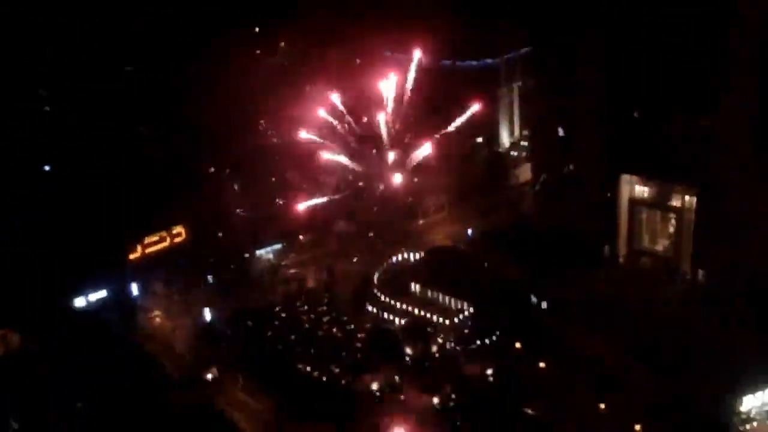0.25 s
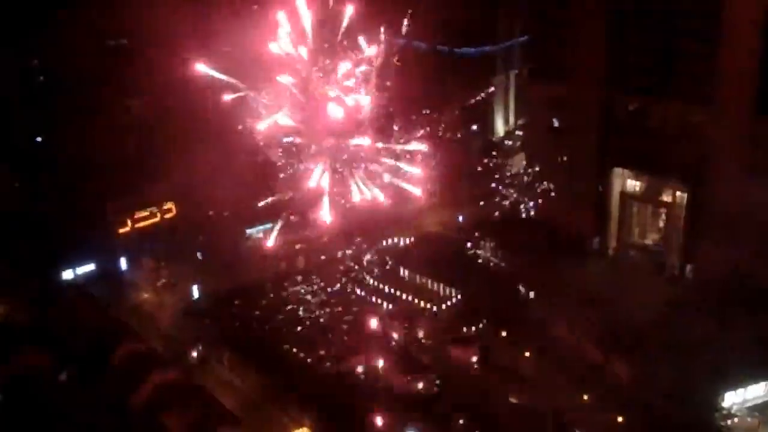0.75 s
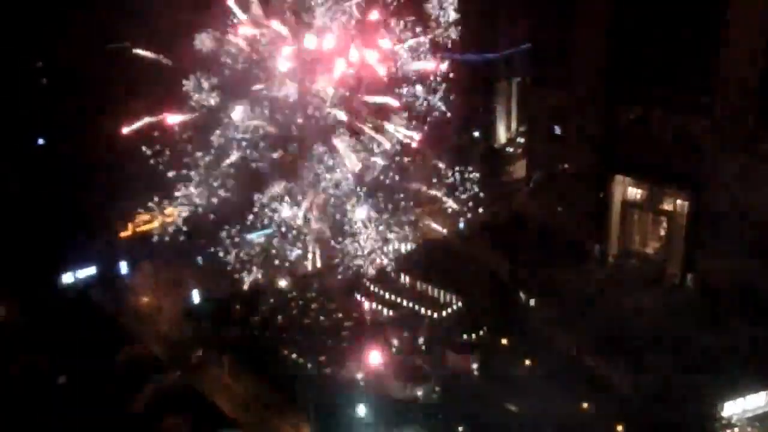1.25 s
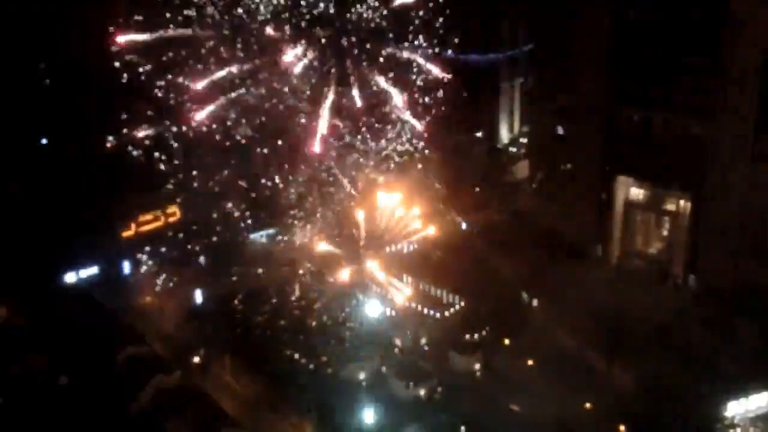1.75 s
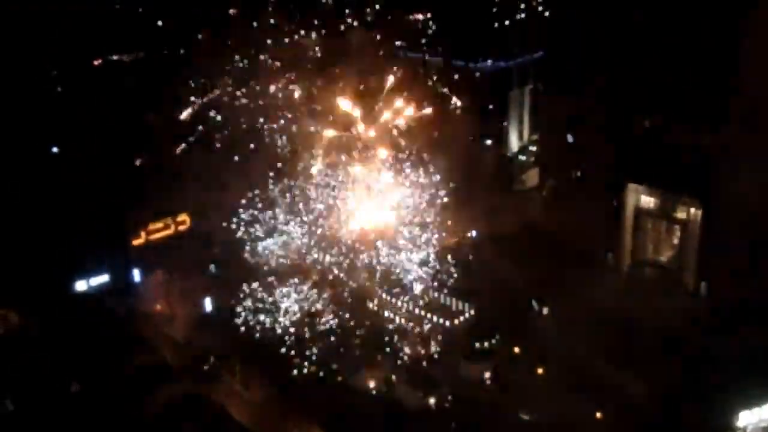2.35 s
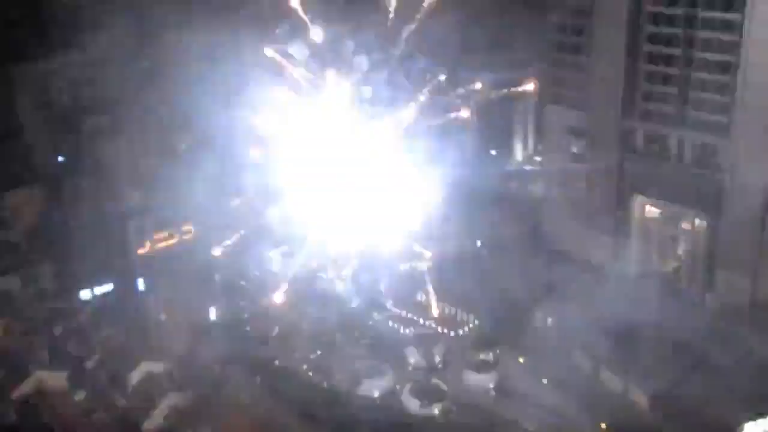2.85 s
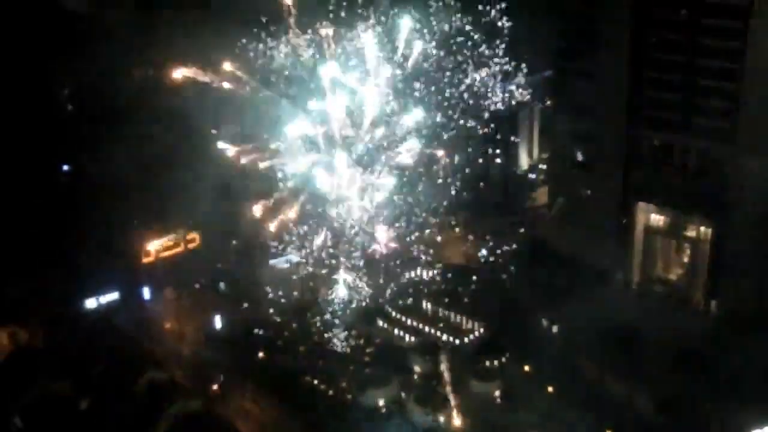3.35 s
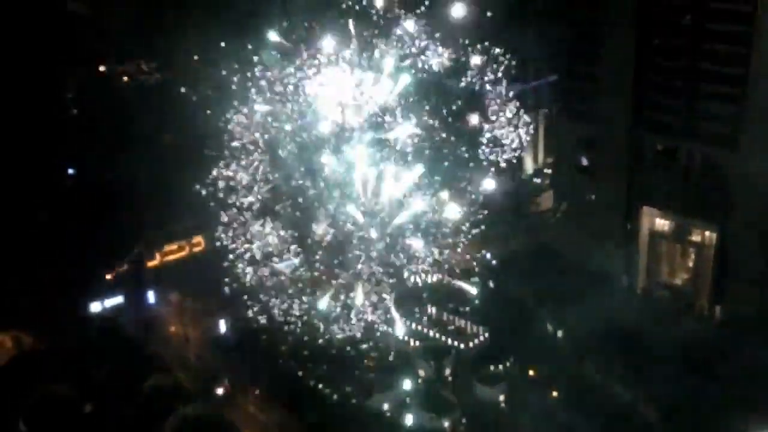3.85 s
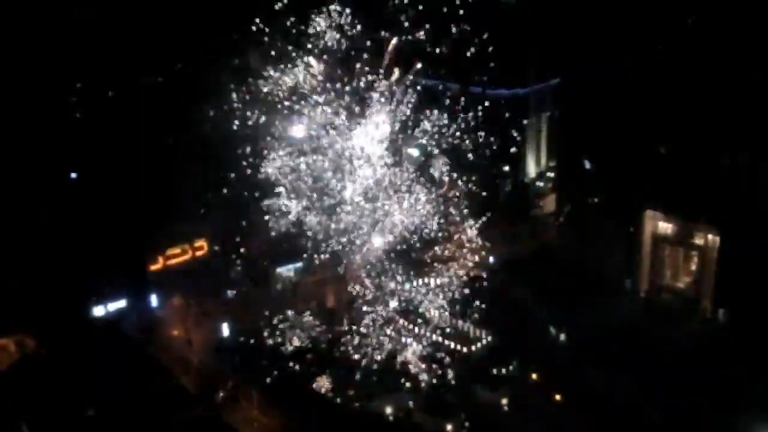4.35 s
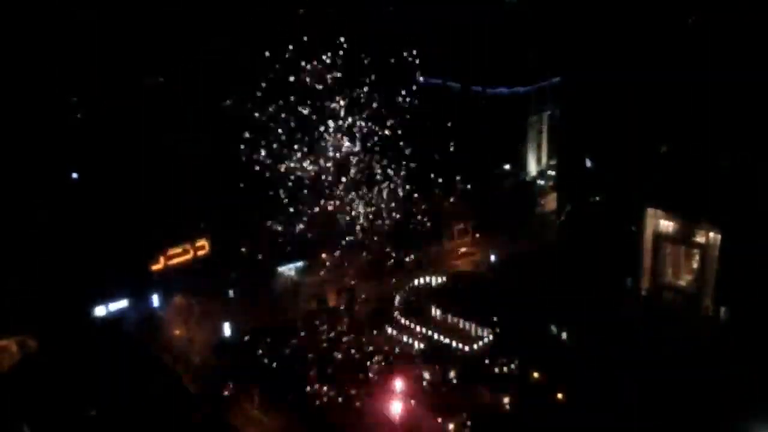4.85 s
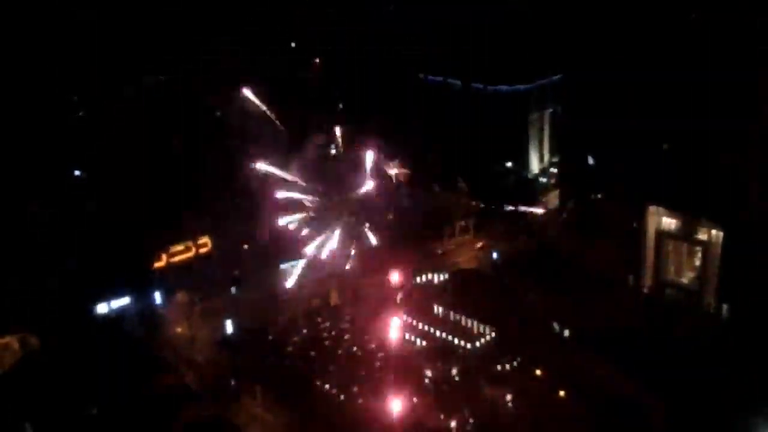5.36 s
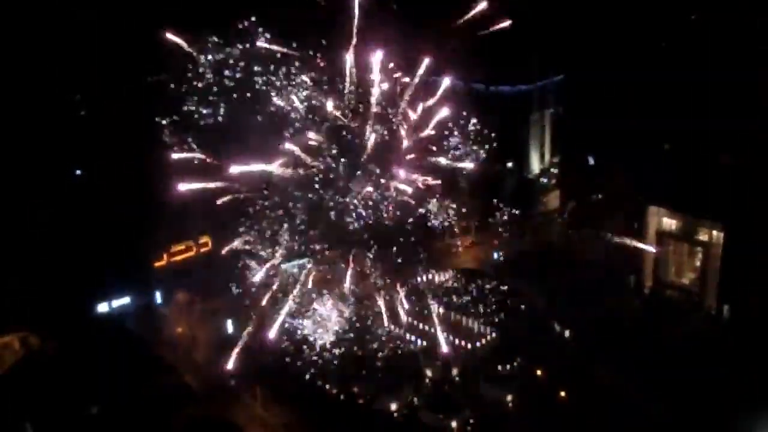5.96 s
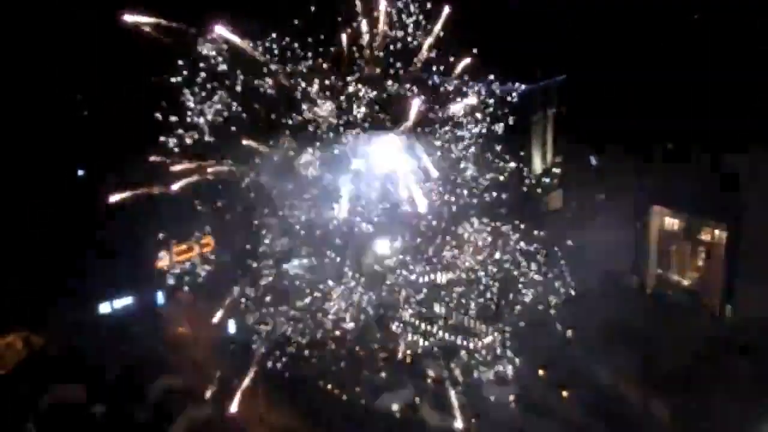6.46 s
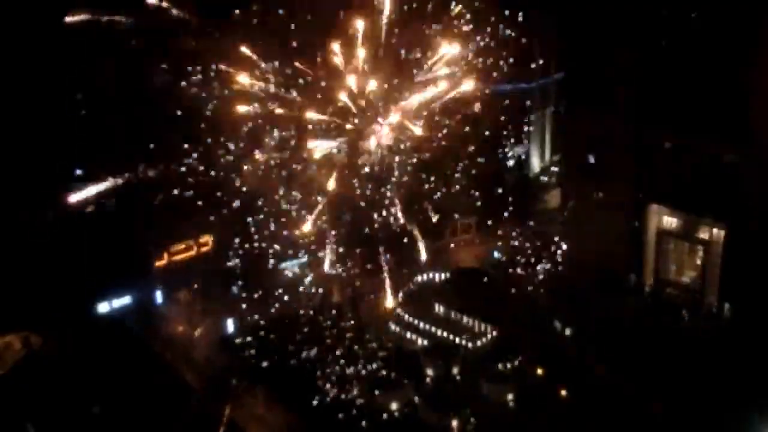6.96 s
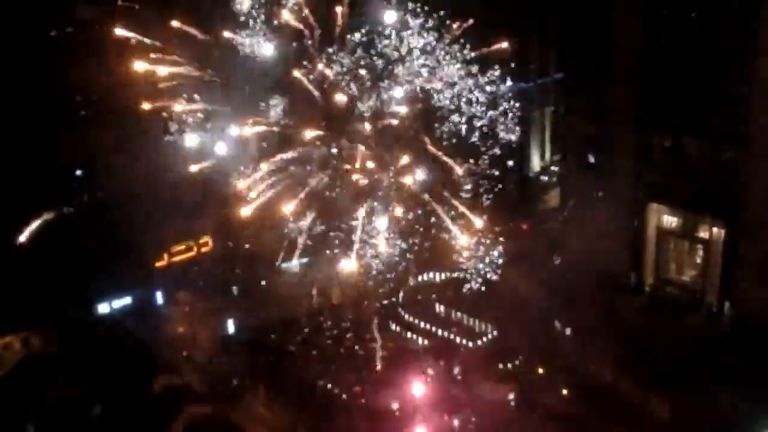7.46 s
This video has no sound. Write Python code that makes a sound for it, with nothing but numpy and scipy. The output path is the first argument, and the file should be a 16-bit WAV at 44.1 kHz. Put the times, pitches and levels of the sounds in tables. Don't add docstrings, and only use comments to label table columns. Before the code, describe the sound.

A dense night firework display in a city, heard from indoors by a closed high window. Deep thumps strike the pane, which snaps and faintly rattles, while small crackers pop irregularly between them. A continuous bed of dry crackling, faint sizzle and distant rumbling barrage never stops. Around one second a quick string of small crackers ticks brightly; later heavy bursts come in close groups.

```python
import sys
import numpy as np
from scipy import signal
from scipy.fft import rfft, irfft, next_fast_len
from scipy.io import wavfile

SR = 44100
rng = np.random.default_rng(int(sys.argv[2]) if len(sys.argv) > 2 else 0)


def makeup_ratio(level_db):
    decades = np.asarray(level_db, float) / 20
    return 10 ** decades


def waveform_to_disk(signal):
    frames = np.transpose(np.atleast_2d(signal))
    scaled = np.clip(frames, -1, 1) * 32767
    samples = np.round(scaled).astype(np.int16)
    wavfile.write(sys.argv[1], SR, samples)


N = 339570

# frequency in Hz, density in dB per Hz.
HISS_SPECTRUM = [(3000, -18.5), (6000, -10), (10000, 2), (13000, 1.5), (15500, -2)]
# frequency in Hz, left over right in dB.
PORT_BALANCE = [(200, 1.7), (600, 1.1), (2000, 1.8), (6000, 3.2), (13000, 1.7)]
# frequency in Hz, likeness 0-1.
PORT_LIKENESS = [(300, 0.99), (1000, 0.99), (2000, .92), (4500, 0.74), (12000, 0.98)]
# frequency in Hz, likeness 0-1.
FRAME_LIKENESS = [(3000, 0.54), (12000, 0.65)]

# time in seconds, level in dB.
FAR_BARRAGE = [(0, -31.5), (.4, -34), (1.1, -29), (2.2, -36.5), (3.2, -30.5), (4, -32.5), (4.8, -35),
               (5.5, -31.5), (6.1, -31), (6.7, -35.5), (7.3, -27), (7.7, -31)]
# time in seconds, crackle in dB, sizzle of the nearest in dB.
BURNING_STARS = [(0.0, -42, -72), (0.66, -44, -73), (0.79, -42.5, -73.5), (2.1, -43.5, -69),
                 (2.27, -43.5, -71.5), (2.59, -44.5, -66), (3.0, -46.5, -79), (3.15, -43, -70),
                 (3.64, -44, -72.5), (4.03, -40, -65), (4.33, -43, -70), (4.76, -42.5, -70),
                 (5.25, -43.5, -75), (5.51, -46.5, -80), (5.96, -45, -74), (6.63, -46.5, -69),
                 (7.25, -42, -72), (7.7, -41.5, -67)]
# centre in seconds, half width in seconds, crackle in dB, sizzle in dB.
STAR_FLARES = [
    (1.22, 0.062, -54, -70),
    (1.98, 0.052, -42, -74),
    (4.63, .06, -43, -61),
    (6.7, 0.038, -46, -70),
]

# frequency in Hz, density in dB per Hz.
RUMBLE_SPECTRUM = [(20, -52), (31, -29.5), (42, 1), (62, -15), (87, -5.5), (105, -5), (125, -4),
                   (160, -3.5), (200, -1), (250, -4), (310, -7.5), (394, -7.5), (450, -14), (900, -64.5)]
ROAR_SPECTRUM = [(240, -18), (400, -4.5), (499, -1.5), (826, -1.5), (928, -5), (1150, -2.5), (1270, -8),
                 (1600, -13.5), (2080, -50), (3520, -120)]
CRACKLE_SPECTRUM = [(900, -48), (1600, -12.5), (2090, -4.5), (2300, -10.5), (2550, -9), (2900, -17),
                    (3800, -25), (5000, -38.5), (7000, -51), (12000, -51)]
SIZZLE_SPECTRUM = [(2500, -37), (4000, -4.5), (5000, -6), (6500, -12.5), (8000, -12.5), (11000, -19),
                   (15500, -23)]
SNAP_SPECTRUM = [(900, -17), (1600, -13), (2100, -8.5), (2550, -6.5), (3000, -14), (3800, -23),
                 (5000, -33.5), (7000, -42), (12000, -62)]
RATTLE_SPECTRUM = [(2500, -44), (4500, -5), (7000, -6), (10000, -9), (12500, -8.5), (15500, -16.5)]

# time in seconds, peak in dB, pitch in Hz.
LAUNCH_TUBES = [
    (0.5701, -14.5, 1380),
    (6.2158, -23.5, 1406),
    (6.2741, -24.5, 1390),
    (6.5914, -29, 1400),
    (6.6500, -23, 1350),
    (0.57, -15.5, 830),
    (2.239, -23, 902),
    (4.897, -19.5, 852),
]
# time in seconds, peak in dB.
CRACKER_STRING = [
    (1.0286, -25),
    (1.1947, -35),
    (1.2211, -29),
    (1.2316, -31),
    (1.287, -29),
    (1.3084, -26),
    (1.3458, -29),
    (1.3723, -26),
    (1.3894, -25),
]
# time in seconds, peak in dB, pitch in Hz.
SPLITTING_STARS = [(0.3804, -53.5, 4280), (1.0505, -49, 4170), (1.1892, -44, 3580), (1.2378, -58, 4350),
                   (1.9183, -38, 3754), (2.504, -43.5, 4110), (2.6646, -56, 4010), (4.0383, -38.5, 4070),
                   (4.3513, -50.5, 3930), (4.6147, -50, 3670), (4.732, -36, 3930), (5.1467, -66.5, 4330),
                   (5.3926, -45.5, 4070), (5.6211, -44, 4530)]
# time in seconds, knock peak in dB.
HIDDEN_CRACKERS = [(.2319, -32), (0.291, -22.5), (.566, -21), (1.1554, -22), (1.7406, -27), (2.4935, -25),
                   (3.1358, -27.5), (4.3121, -23.5), (4.3507, -24), (5.3927, -33), (5.4565, -45.5),
                   (5.5043, -27), (5.6174, -29), (6.33, -26.5), (6.645, -24), (6.817, -32), (7.3544, -25)]
# time in seconds, snap peak in dB, knock over snap in dB.
NEAR_CRACKERS = [(0.2626, -35, 7), (0.3155, -31.5, 11), (.609, -31, 8), (1.344, -33, -9),
                 (0.8354, -25, -0.5), (1.0217, -19.5, 4), (1.195, -29, 4.5), (1.224, -27, 7),
                 (1.287, -32, 7.5), (1.3718, -28, 5), (1.5364, -27.5, -0.5), (1.9514, -29.5, -2.5),
                 (2.0852, -31, -19), (2.1875, -34, 1), (2.2374, -26.5, 7), (2.4555, -28, -3),
                 (3.3122, -28, 5.5), (5.1467, -35, -12.5), (4.727, -25, 4), (4.857, -27.5, -6),
                 (4.8857, -23, -7.5), (5.021, -26.5, -1), (5.264, -31.5, 9), (5.863, -26.5, 1),
                 (6.1978, -26, 5), (6.6325, -30, 5.5), (6.9566, -31.5, -3.5), (7.2183, -30, 8),
                 (7.4098, -27, 5.5), (7.5313, -26, 5)]
# time in seconds, peak in dB.
FAR_SHELLS = [(0.29, -23), (0.776, -18), (0.854, -18), (1.017, -17), (1.093, -20), (1.446, -20),
              (2.371, -24), (2.638, -15.5), (3.464, -21.5), (3.53, -26), (3.983, -19), (5.235, -24),
              (5.945, -17), (6.258, -17), (6.912, -20), (7.215, -18), (7.489, -13)]
# time in seconds, blast strength 0-1, snap peak in dB, rattle peak in dB.
NEAR_SHELLS = [(0.0776, 0.53, -21, -43), (0.6757, 0.7, -18, -37), (.7261, 0.4, -17, -44.5),
               (0.8994, .44, -18, -48), (1.3981, 0.53, -18.5, -42), (1.7631, 0.45, -19, -37.5),
               (2.5287, .73, -13, -36), (2.7469, .63, -17, -40.5), (2.9489, .39, -22.5, -41),
               (3.0304, 0.5, -20.5, -42.5), (3.2443, .43, -21, -40), (3.3371, 0.4, -17.5, -39.5),
               (3.6846, .31, -23, -42.5), (3.8252, .37, -20.5, -43), (5.3109, 0.84, -17.5, -32.5),
               (5.7032, 0.7, -16.5, -32.5), (5.7559, .58, -19.5, -40), (6.0542, .36, -22, -48),
               (6.1402, 0.4, -17.5, -36), (6.8445, 0.4, -20, -41), (7.0259, .48, -18.5, -40.5),
               (7.0884, .44, -21, -43), (7.2987, .58, -20, -38.5), (7.6871, 0.3, -17.1, -35)]

# frequency in Hz, gain, T60 in seconds.
PANE_MODES = [(82, -.14, .3), (117, -.24, .125), (160, .14, .3), (228, .58, .054), (293, .09, .14),
              (382, .2, .13), (550, .07, .18), (751, .12, .04), (851, -.19, .036), (1210, -.02, .24),
              (1461, -.03, .06)]
# delay in seconds, gain.
WALL_ECHOES = [
    (0, 1),
    (.00583, .48),
    (.00789, -.28),
    (.00984, .78),
]


def unit(x):
    return x / np.sqrt(np.mean(x ** 2) + 1e-20)


def along(points, hz):
    f, v = np.transpose(points)
    return np.interp(np.log(hz + 1), np.log(f + 1), v)


def curves(rows):
    s, *columns = np.transpose(rows)
    return [np.interp(np.arange(N) / SR, s, column) for column in columns]


def filtered(x, response):
    m = next_fast_len(N + 8192)
    return irfft(rfft(x, m) * response(np.fft.rfftfreq(m, 1 / SR)), m)[..., :N]


def noise(spectrum, envelope, alike=PORT_LIKENESS):
    density = makeup_ratio(along(spectrum, np.linspace(0, SR / 2, 4096)))
    scale = np.sqrt(np.mean(density ** 2))

    def colour(hz):
        angle = np.arccos(np.clip(along(alike, hz), 0, 1)) / 2
        return makeup_ratio(along(spectrum, hz)) / scale * [np.cos(angle), np.sin(angle)]

    mid, side = filtered(envelope * rng.standard_normal((2, N)), colour)
    return np.array([mid + side, mid - side])


def spikes(times, sizes):
    at = np.round(np.multiply(times, SR)).astype(int)
    return np.bincount(np.clip(at, 0, N - 1), sizes, N)


def bursts(impulses, rise, hold, t60):
    t = np.arange(SR // 4) / SR
    shape = (1 - np.exp(-t / rise)) * makeup_ratio(-60 * np.clip(t - hold, 0, None) / t60)
    return np.sqrt(np.abs(signal.fftconvolve(impulses ** 2, shape ** 2)[:N]))


def swarm(count, spread_db):
    moment, size = rng.random((count, 2)).T
    return spikes(moment * N / SR, makeup_ratio(-spread_db * size))


def rings(times, sizes, hz, cycles):
    t = np.arange(SR // 40) / SR
    age = t * (hz / cycles)[:, None]
    tones = sizes[:, None] * age * np.exp(1 - age) * np.sin(2 * np.pi * hz[:, None] * t)
    at = np.round(times * SR).astype(int)[:, None] + np.arange(len(t))
    return np.bincount(at.ravel(), tones.ravel(), N + SR)[:N]


def sparks(spectrum, lo_hz, hi_hz, count, spread_db):
    when, pitch, size, life, side = rng.random((count, 5)).T
    hz = lo_hz * (hi_hz / lo_hz) ** pitch
    gain = makeup_ratio(along(spectrum, hz) - spread_db * size) * np.sqrt(hz)
    cycles = 3.0 + 9 * life
    left = rings(when * N / SR, gain * (0.52 + 1.1 * side), hz, cycles)
    right = rings(when * N / SR, gain * (1.4 - 0.76 * side), hz, cycles)
    return unit(np.array([left, right]))


def pane(blasts):
    t = np.arange(SR // 3) / SR
    ring = sum(g * np.sin(2 * np.pi * hz * t) * makeup_ratio(-60 * t / t60) for hz, g, t60 in PANE_MODES)
    ring = ring * (1 - np.exp(-t / .0006))
    heard = signal.fftconvolve(spikes(*np.transpose(WALL_ECHOES))[:SR // 50], ring)
    return filtered(signal.fftconvolve(blasts, heard)[:N], lambda hz: 1 / (1 + (hz / 2500) ** 6))


def street_roll():
    rise_s, t60_s = 0.094, 2.44
    t = np.arange(2 * SR) / SR
    echo = (1 - np.exp(-t / rise_s)) * makeup_ratio(-60 * t / t60_s)
    s, strength, _, _ = np.transpose(NEAR_SHELLS)
    return np.abs(signal.fftconvolve(spikes(s, strength) ** 2, echo ** 2)[:N])


def flares():
    s, width, *levels = np.transpose(STAR_FLARES)[..., None]
    glow = np.exp(-((np.arange(N) / SR - s) / width) ** 2)
    return [np.sum(glow * makeup_ratio(db) ** 2, axis=0) for db in levels]


def sky():
    rumble_roll_db, roar_roll_db, roar_mean_db = -27.5, -36.5, -34
    per_crackle_db, per_barrage_db = 0.8, 0.26
    roll = street_roll()
    (far_db,), (crackle_db, sizzle_db) = curves(FAR_BARRAGE), curves(BURNING_STARS)
    steady_db = roar_mean_db + per_crackle_db * (crackle_db - crackle_db.mean())
    steady_db = steady_db + per_barrage_db * (far_db - far_db.mean())
    rumble = np.sqrt(makeup_ratio(far_db) ** 2 + makeup_ratio(rumble_roll_db) ** 2 * roll)
    roar = np.sqrt(makeup_ratio(steady_db) ** 2 + makeup_ratio(roar_roll_db) ** 2 * roll)
    crackle_flare, sizzle_flare = flares()
    crackle = np.sqrt(makeup_ratio(crackle_db + 1.5) ** 2 + crackle_flare)
    sizzle = np.sqrt(makeup_ratio(sizzle_db + 1.5) ** 2 + sizzle_flare)
    return rumble, roar, crackle, sizzle


def far_rumble(level, dull):
    thumps = unit(pane(swarm(count=420, spread_db=14)))
    return noise(RUMBLE_SPECTRUM, level * makeup_ratio(1.0) * unit(4.1 + dull)) + level * makeup_ratio(-10.0) * thumps


def far_roar(level, dull, stars):
    return noise(ROAR_SPECTRUM, level * unit(3.6 + dull + 0.76 * stars))


def star_crackle(level, sharp, stars):
    bed = noise(CRACKLE_SPECTRUM, level * makeup_ratio(-1.4) * unit(2.5 + sharp + 0.33 * stars))
    return bed + level * makeup_ratio(-9.0) * sparks(CRACKLE_SPECTRUM, 1479, 4280, count=900, spread_db=15.5)


def star_sizzle(level, sharp, stars):
    fine = unit(bursts(swarm(count=500, spread_db=15), rise=.0008, hold=.003, t60=.04))
    bed = noise(SIZZLE_SPECTRUM, level * makeup_ratio(0.1) * unit(1.0 + .35 * sharp + .6 * stars + .6 * fine))
    return bed + level * makeup_ratio(-7) * sparks(SIZZLE_SPECTRUM, 3890, 9000, count=1200, spread_db=16)


def display():
    rumble, roar, crackle, sizzle = sky()
    dull, sharp = (unit(bursts(swarm(count=260, spread_db=18.0), rise=0.0013, hold=0.0027, t60=0.11))
                   for _ in range(2))
    stars = unit(bursts(swarm(count=2000, spread_db=26.0), rise=0.00047, hold=.00041, t60=0.025))
    low = far_rumble(rumble, dull) + far_roar(roar, dull, stars)
    return low + star_crackle(crackle, sharp, stars) + star_sizzle(sizzle, sharp, stars)


def launch_tubes():
    s, db, hz = np.transpose(LAUNCH_TUBES)
    return rings(s - .002, makeup_ratio(db - 2.5), hz, 2.3 + rng.random(len(s)))


def cracker_string():
    s, db = np.transpose(CRACKER_STRING)
    hz = 2075 * (1 + 0.016 * rng.standard_normal(len(s)))
    return rings(s - .001, makeup_ratio(db - 4.5), hz, cycles=8.6)


def splitting_stars():
    s, db, hz = np.transpose(SPLITTING_STARS)
    return rings(s - .002, makeup_ratio(db - 7.5), hz, 9 + 3.5 * rng.random(len(s)))


def blasts():
    snap_lag_s = .0018
    full_knock_db, knock_growth = -14, 0.49
    cracker_rattle_db, hidden_snap_db = -32, -8.5
    rows = []
    for s, strength, snap_db, rattle_db in NEAR_SHELLS:
        knock_db = full_knock_db + knock_growth * 20 * np.log10(strength)
        rows.append((s + snap_lag_s, snap_db, knock_db, rattle_db))
    for s, snap_db, knock_over_db in NEAR_CRACKERS:
        rows.append((s, snap_db, snap_db + knock_over_db, snap_db + cracker_rattle_db))
    for s, knock_db in HIDDEN_CRACKERS:
        snap_db = knock_db + hidden_snap_db
        rows.append((s, snap_db, knock_db, snap_db + cracker_rattle_db))
    return np.transpose(rows)


def knocks(s, db):
    return noise(ROAR_SPECTRUM, bursts(spikes(s, makeup_ratio(db - 5.5)), rise=0.0071, hold=0.015, t60=.06))


def snaps(s, db):
    return noise(SNAP_SPECTRUM, bursts(spikes(s, makeup_ratio(db - 10.5)), rise=0.0014, hold=0.0061, t60=0.089))


def rattles(s, db):
    envelope = bursts(spikes(s - .0015, makeup_ratio(db - 7)), rise=0.00054, hold=0.0036, t60=0.064)
    impacts = unit(bursts(swarm(count=4000, spread_db=17), rise=.0001, hold=.0002, t60=0.0044))
    return noise(RATTLE_SPECTRUM, envelope * unit(0.66 + impacts), FRAME_LIKENESS)


def cracks():
    s, snap_db, knock_db, rattle_db = blasts()
    return knocks(s, knock_db) + snaps(s, snap_db) + rattles(s, rattle_db)


def shells():
    s, db = np.transpose(FAR_SHELLS)
    far = filtered(spikes(s, makeup_ratio(db + 5)), lambda hz: 1 / (1 + 1j * hz / 500) ** 2)
    s, strength, _, _ = np.transpose(NEAR_SHELLS)
    return makeup_ratio(-3.5) * pane(spikes(s, strength) + far)


def scene():
    pops = launch_tubes() + cracker_string() + splitting_stars()
    return display() + pops + cracks() + shells()


def top_cut(x):
    return signal.sosfilt(signal.butter(12, 15830, fs=SR, output="sos"), x)


def record(dry):
    def response(hz):
        band = (1 - 1 / (1 + (hz / 33) ** 8)) * (hz < 15830)
        return makeup_ratio(along(PORT_BALANCE, hz) * [[.5], [-.5]]) * band

    return top_cut(filtered(dry + noise(HISS_SPECTRUM, makeup_ratio(-77.5)), response))


dry = scene()
out = record(dry)
waveform_to_disk(out)
```